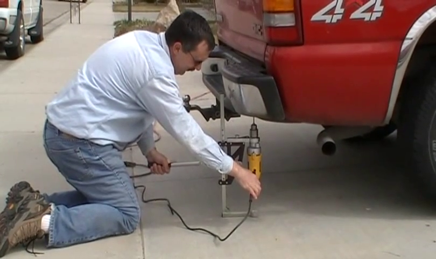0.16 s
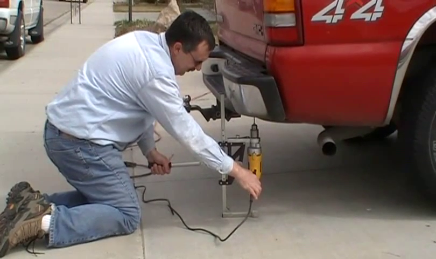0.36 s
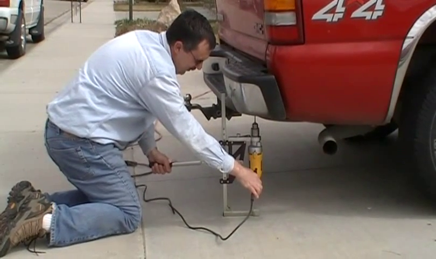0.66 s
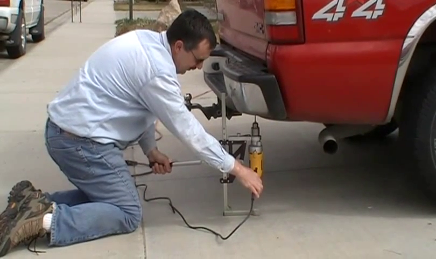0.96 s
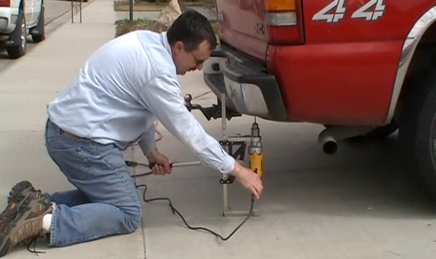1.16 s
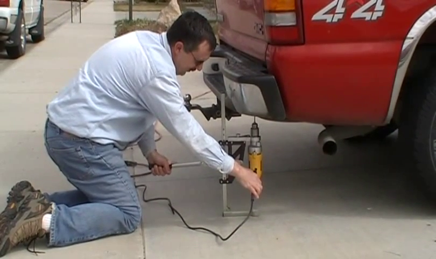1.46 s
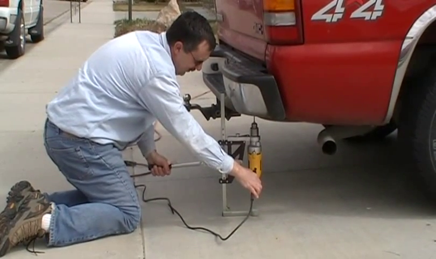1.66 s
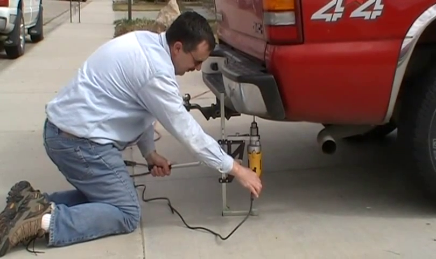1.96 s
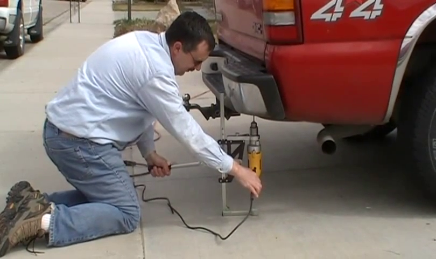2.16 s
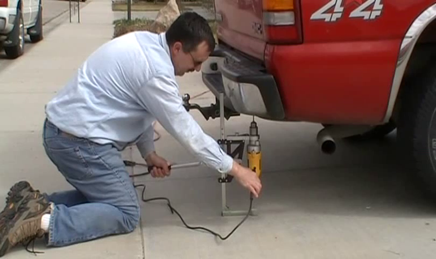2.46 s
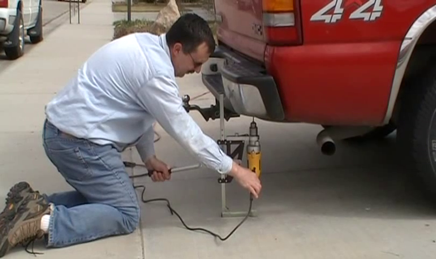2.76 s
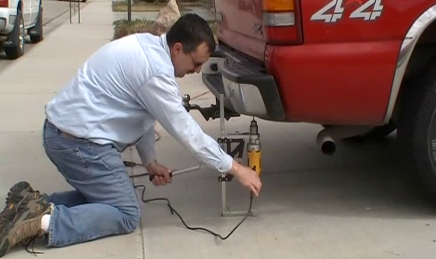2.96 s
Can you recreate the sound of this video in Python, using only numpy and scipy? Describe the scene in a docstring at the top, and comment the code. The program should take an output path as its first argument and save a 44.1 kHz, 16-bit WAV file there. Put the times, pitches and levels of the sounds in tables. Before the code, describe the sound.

Close outdoor stereo pickup of an electric drill already running: steady whine, wavering piercing whistle and dense airy hiss throughout, brief high chirps from the bit, and wind bumping the microphone, strongest midway.

```python
"""On an open concrete driveway, a corded drill clamped in a stand runs at a nearly steady high speed.
The motor whines on multiples of its shaft speed, some of them throbbing with the mains.
Fan air, brushes and gears are noise hissing through the housing, fluttering as the chuck turns.
A faint hum and drone lie underneath; light wind buffets and thumps the microphone with low noise and
short pressure pulses, and the bit gives tiny squeaks, each a rough falling chirp."""
import sys
import numpy as np
from scipy import signal
from scipy.fft import rfft, irfft
from scipy.io import wavfile
from scipy.ndimage import uniform_filter1d

SR = 44100
rng = np.random.default_rng(int(sys.argv[2]) if len(sys.argv) > 2 else 0)


def store_wav(level_fs):
    """Save 16-bit WAV to argv[1]."""
    pcm = np.round(np.clip(np.atleast_2d(level_fs), -1, 1) * 32767)
    wavfile.write(sys.argv[1], SR, pcm.T.astype(np.int16))


N = 136710
T = np.arange(N) / SR

# Motor shaft speed. Each row: time in seconds, speed in turns per second.
SHAFT_SPEED = [(0, 390.1), (0.28, 391.15), (0.6, 392.3), (0.95, 392.35), (1.25, 393), (1.75, 393.05),
               (2.55, 392.8), (3.1, 392.75)]
WANDER_RAD = .005  # rms drift of the shaft angle

# Mains: the kick of current comes once a cycle, and sharper pulses are shorter.
MAINS_HZ, MAINS_FIRES_S, PULSE_SHARPNESS = 60, .010, 3.4
DRAG_RAD = 0.94  # phase swing of a partial at full throb depth

# Motor partials. Each row: multiple of the shaft speed, level in dB before TONES_DB,
# depth of the mains throb from 0 to 1.
MOTOR_PARTIALS = [(2, -35, 0.09), (3, -49, 0), (4, -37, 0.05), (8, -44, 0), (12, -35, 0.58),
                  (18, -42.5, 0.1), (19, -40, 0.1), (20, -33.5, 0), (23, -48, .2), (24, -36.5, .15),
                  (26, -49, 0.6), (32, -47, .2), (34, -50, .2)]
TONES_DB, TONE_PAN_DB, FLUTTER_DB, FLUTTER_HZ = -.5, 1, 0.86, 10.6
SETTLE_DB_PER_HZ = 0.9  # the lowest tone grows as the shaft comes up to speed
FUZZ, FUZZ_HZ = .3, 45  # random fraying at the whistle, and its bandwidth

# Top whistle, from the commutator. Each row: time in seconds, level in dB before WHISTLE_DB.
WHISTLE_LEVEL = [(0, -25), (.55, -23), (.78, -32), (1.17, -23.5), (1.45, -25), (1.57, -30), (1.67, -24),
                 (1.9, -28), (2.08, -27), (2.23, -21), (2.36, -18), (2.45, -30), (2.53, -24), (2.66, -30),
                 (2.88, -17.5), (3.02, -21), (3.1, -20)]
WHISTLE_ORDER = 40  # multiple of the shaft speed
WHISTLE_DB, WHISTLE_THROB, WHISTLE_PAN_DB, WHISTLE_FLUTTER_DB = -.5, 0.4, -1.5, 2
WHISTLE_LEAD_RAD, WHISTLE_LAG_S = 0.46, .010  # left ahead of right; throb behind the current

# Rush of fan, brushes and gears, coloured by the housing and the ground.
# Each row: frequency in Hz, relative density in dB per Hz.
RUSH_COLOUR = [(25, -112), (60, -89), (130, -81), (350, -79), (480, -72), (700, -71.5), (765, -61),
               (812, -71), (832, -58.5), (868, -56), (888, -50), (904, -57.5), (919, -49.5), (945, -67.5),
               (985, -67.5), (1003, -57), (1040, -63), (1090, -65.5), (1170, -58.5), (1300, -61.5),
               (1500, -58.5), (1720, -62), (1870, -55.5), (2100, -59.5), (2270, -63), (2650, -63.5),
               (3030, -66), (3380, -57.5), (3900, -57.5), (4450, -60.5), (4800, -62), (5350, -65),
               (6100, -59.5), (6500, -62), (7000, -55), (7250, -60.5), (7650, -56), (8150, -56.5),
               (8750, -64.5), (9450, -57), (10250, -56), (10850, -62.5), (11100, -58), (11600, -60),
               (12000, -61.5), (12700, -63.5), (13200, -63.5), (13700, -61.5), (14600, -68), (15500, -71)]
# Slow level of the rush. Each row: time in seconds, relative level in dB.
RUSH_CONTOUR = [(0, 2), (.8, 2.8), (1.2, 2), (1.4, -0.1), (1.52, 2), (2.3, 1.5), (2.88, 2), (3.04, -0.5)]
# Stereo image of the rush. Each row: frequency in Hz, likeness of the two sides (1 is identical),
# left-right difference in dB.
RUSH_STEREO = [(100, 0.47, -8), (604, 0.72, 0), (860, 0.6, 3), (1290, 0.57, 3), (1920, 1, 2.5),
               (2790, 0.16, 1), (3540, 0.89, -2.5), (4370, 0.7, -0.5), (5500, 0.18, -0.5), (6130, 0.7, -1),
               (7740, 0.96, 0.5), (8400, 0.77, -0.5), (8900, 0.95, 0.5), (12000, 0.77, 0), (15500, 0.4, -4)]
RUSH_DB, RUSH_THROB, RUSH_PULSE_SHARPNESS = -19, .022, 6
PATCHY_DB, SURGE_DB, FLICKER_DB, FLICKER_HZ = 0.58, .4, 0.4, 23  # short patches, long surges, whole level

# Load swings as the chuck turns. Each row: swings per chuck turn, depth in dB.
CHUCK_SWINGS = [(1, .38), (2, .28), (4, .45)]
GEAR_RATIO = 30  # shaft turns per chuck turn

# Faint low hum. Each row: time in seconds, level in dB.
HUM_LEVEL = [(0, -55), (.5, -59), (1.4, -49.5), (1.95, -50), (2.1, -67)]
HUM_HZ, HUM_WAVER_HZ, HUM_WAVER_RATE_HZ, HUM_FLUTTER_DB = 254.8, 4.3, 26, 3.5
# Soft low drone that grows late. Each row: time in seconds, level in dB.
DRONE_LEVEL = [(0, -76), (2.2, -55), (2.7, -52)]
DRONE_HZ, DRONE_WIDTH_HZ = 350, 47

# Colour of the wind rumble. Each row: frequency in Hz, relative density in dB per Hz.
WIND_COLOUR = [(30, -39), (65, -5), (105, 1.5), (175, 1.5), (265, -1.5), (400, -15), (900, -51)]
# Gusts at the microphone. Each row: centre in seconds, half-length in seconds, level in dB.
WIND_GUSTS = [(0.616, 0.015, -35), (0.753, 0.051, -32), (0.909, 0.026, -41), (1.14, 0.071, -40),
              (1.514, 0.046, -40), (1.645, 0.036, -38), (2.144, 0.067, -40.5), (2.49, 0.033, -40),
              (2.84, 0.047, -42), (3.092, 0.046, -35)]
BREEZE_DB, LUMP_DB, LUMP_HZ = -56.5, 3, 30
WIND_COMMON_DB = -11  # the push shared by both ports, against the opposed push

# Single eddies that thump the microphone. Each row: centre in seconds, peak in dB (averaged in power
# over both sides), width in seconds, left-right difference in dB.
EDDIES = [(0.635, -25, .0019, -5), (.765, -18, 0.0016, -4), (0.912, -17, 0.0013, -4.5),
          (1.137, -25, .002, -4), (1.509, -20, 0.0015, 5), (1.5383, -7, 0.0011, 5.5),
          (1.623, -18.5, 0.0019, -5.5), (2.135, -22, .002, 3)]

# Squeaks of the bit. Each row: start in seconds, level in dB before SQUEAK_DB,
# pitch in Hz reached at the peak.
BIT_SQUEAKS = [(.825, -28, 11740), (1.053, -27, 11850), (1.128, -24, 12000), (1.207, -27, 12100),
               (1.296, -29, 8850), (1.667, -26, 12400), (2.030, -27, 12100), (2.434, -28, 12600),
               (2.487, -26, 12280), (2.983, -25, 14900), (3.07, -25, 13600)]
SQUEAK_RISE_S, SQUEAK_WIDTH_HZ, SQUEAK_DB, HALF_PITCH_DB = 0.0026, 170, 6, -5
SQUEAK_SAG = 0.0136  # share by which the pitch falls per rise time

EDGE_HZ = 15770  # top of the finished sound


def amp(db):
    """Decibels to gain."""
    return 10 ** (np.asarray(db) / 20)


def unit(x):
    """Scales to an rms of one."""
    return x / np.sqrt(np.mean(abs(x) ** 2) + 1e-20)


def curve(points):
    """Reads a table of time and value at every sample."""
    return np.interp(T, *np.transpose(points))


def over_hz(table, hz, axis=1):
    """Reads one column of a table on a log-frequency axis."""
    columns = np.transpose(table)
    return np.interp(np.log(hz + 1), np.log(columns[0] + 1), columns[axis])


def pan(db):
    """Left and right gains for a level difference."""
    return unit(amp([[db / 2], [-db / 2]]))


def band(hz, width_hz, size=N):
    """Noise in a bell-shaped band; centred on zero it is a slow random drift."""
    f = np.fft.rfftfreq(size, 1 / SR)
    bell = np.exp(-.5 * ((f - hz) / width_hz) ** 2)
    return unit(irfft(rfft(rng.standard_normal(size)) * bell, size))


def swell(s, half_s):
    """A bell-shaped rise and fall."""
    return np.exp(-.5 * ((T - s) / half_s) ** 2)


def shaft_angle():
    """The shaft turns almost steadily, its angle the running sum of its speed plus a slight drift."""
    return 2 * np.pi * np.cumsum(curve(SHAFT_SPEED)) / SR + WANDER_RAD * band(0, FLUTTER_HZ)


def mains_cycle(lag_s):
    """Angle of the mains, zero at lag_s after each kick of current."""
    return 2 * np.pi * MAINS_HZ * (T - MAINS_FIRES_S - lag_s)


def throb(depth, sharpness, lag_s=0):
    """A gain that swells once in every mains cycle, lag_s after the kick of current."""
    pulse = np.exp(sharpness * np.cos(mains_cycle(lag_s)))
    return 1 - depth + depth * pulse / pulse.mean()


def tone(angle, depth, flutter_db, fuzz=0, lag_s=0):
    """A fluttering partial that swells and sags in pitch with the mains; fuzz frays it."""
    depth = np.clip(depth, 0, 1)
    level = throb(depth, PULSE_SHARPNESS, lag_s) * amp(flutter_db * band(0, FLUTTER_HZ))
    drag = depth * DRAG_RAD * np.sin(mains_cycle(lag_s))
    angle = angle - drag + 2 * np.pi * rng.random()
    frayed = level + fuzz * (band(0, FUZZ_HZ) + 1j * band(0, FUZZ_HZ))
    return unit((frayed * np.exp(1j * angle)).real)


def whine(angle):
    """Multiples of the shaft speed, the low ones leaning left, topped by the commutator whistle."""
    settle_db = SETTLE_DB_PER_HZ * (curve(SHAFT_SPEED) - curve(SHAFT_SPEED).mean())
    tones = 0
    for k, db, depth in MOTOR_PARTIALS:
        level = amp(db + settle_db * (k == 2))
        fuzz = FUZZ * k / WHISTLE_ORDER  # higher partials fray more
        tones = tones + level * pan(TONE_PAN_DB * (k < 6)) * tone(k * angle, depth, FLUTTER_DB, fuzz)
    sides = WHISTLE_ORDER * angle + np.array([[WHISTLE_LEAD_RAD], [0]])
    whistle = tone(sides, WHISTLE_THROB, WHISTLE_FLUTTER_DB, FUZZ, WHISTLE_LAG_S)
    whistle = amp(curve(WHISTLE_LEVEL) + WHISTLE_DB) * whistle
    return amp(TONES_DB) * tones + pan(WHISTLE_PAN_DB) * whistle


def chuck_db(angle):
    """The level flutters with every turn of the geared-down chuck."""
    return sum(db * np.cos(k * angle / GEAR_RATIO + 2 * np.pi * rng.random()) for k, db in CHUCK_SWINGS)


def blotches(shape, bins, frames):
    """Random level patches, smoothed over frequency bins and time frames."""
    across_hz = uniform_filter1d(rng.standard_normal(shape), size=bins, axis=0)
    return unit(uniform_filter1d(across_hz, size=frames, axis=1))


def rush(angle):
    """Patchy turbulence and brush scrape, pulsing with mains and chuck, through the housing's resonances."""
    grains = signal.stft(rng.standard_normal((2, N)), nperseg=256)[2]
    patches = blotches(grains[0].shape, 7, 9)
    surges = blotches(grains[0].shape, 5, 35)
    uneven = grains * amp(PATCHY_DB * patches + SURGE_DB * surges)
    turbulence = signal.istft(uneven, nperseg=256)[1][:, :N]
    flutter = amp(chuck_db(angle) + FLICKER_DB * band(0, FLICKER_HZ))
    a, b = rfft(turbulence * throb(RUSH_THROB, RUSH_PULSE_SHARPNESS) * flutter)
    hz = np.fft.rfftfreq(N, 1 / SR)
    same = np.clip(over_hz(RUSH_STEREO, hz), -1, 1)
    side_db = over_hz(RUSH_STEREO, hz, axis=2)
    # the right side shares part of the left and fills up with its own noise
    left = a * amp(side_db / 2)
    right = (same * a + np.sqrt(1 - same ** 2) * b) * amp(-side_db / 2)
    coloured = irfft(np.array([left, right]) * amp(over_hz(RUSH_COLOUR, hz)), N)
    return amp(RUSH_DB) * unit(coloured * amp(curve(RUSH_CONTOUR)))


def hum():
    """A faint hum blurred by random pitch waver, and a soft drone of narrow noise, under the drill."""
    pitch = HUM_HZ + HUM_WAVER_HZ * band(0, HUM_WAVER_RATE_HZ)
    angle = 2 * np.pi * np.cumsum(pitch) / SR
    blurred = amp(curve(HUM_LEVEL)) * tone(angle, 0, HUM_FLUTTER_DB)
    return blurred + amp(curve(DRONE_LEVEL)) * band(DRONE_HZ, DRONE_WIDTH_HZ)


def rumble():
    """Two unrelated low wind noises."""
    colour = amp(over_hz(WIND_COLOUR, np.fft.rfftfreq(N, 1 / SR)))
    return unit(irfft(rfft(rng.standard_normal((2, N))) * colour, N))


def wind():
    """Lumpy gusts with lulls between them push the two microphone ports mostly in opposite directions."""
    strength = amp(BREEZE_DB) + sum(amp(db) * swell(s, half_s) for s, half_s, db in WIND_GUSTS)
    lumps = unit(amp(LUMP_DB * band(0, LUMP_HZ)))
    opposed, common = rumble() * strength * lumps
    return np.array([opposed, -opposed]) + amp(WIND_COMMON_DB) * common


def puffs():
    """Each eddy is a pressure pulse with an undershoot on both sides, pushing one port and pulling the other."""
    out = np.zeros((2, N))
    for s, db, width_s, side_db in EDDIES:
        pulse = ((1 - 1j * (T - s) / width_s) ** -3).real
        out += amp(db) * pan(side_db) * np.array([pulse, -pulse])
    return out


def squeaks(size=1024):
    """The cutting edge sticks for a few milliseconds: a rough, falling chirp with a weaker octave below."""
    out = np.zeros(N + size)
    u = np.arange(size) / SR / SQUEAK_RISE_S  # time in rise times
    for s, db, hz in BIT_SQUEAKS:
        pitch = hz * (1 - SQUEAK_SAG * (u - 1)) + SQUEAK_WIDTH_HZ * band(0, 1000, size)
        angle = 2 * np.pi * np.cumsum(pitch) / SR
        ring = unit(np.sin(angle) + amp(HALF_PITCH_DB) * np.sin(angle / 2))
        envelope = u * np.exp(1 - u)
        out[round(s * SR):][:size] += amp(db + SQUEAK_DB) * envelope * ring
    return out[:N]


def scene():
    """The drill in the open air: whine and rush share one shaft, with hum, wind and squeaks added."""
    angle = shaft_angle()
    return whine(angle) + rush(angle) + hum() + wind() + puffs() + squeaks()


def record(dry):
    """A steep low-pass closes off the top of the treble."""
    lowpass = signal.firwin(2047, EDGE_HZ, window=("kaiser", 8), fs=SR)
    return signal.oaconvolve(dry, lowpass[None], "same")


dry = scene()
out = record(dry)
store_wav(out)
```